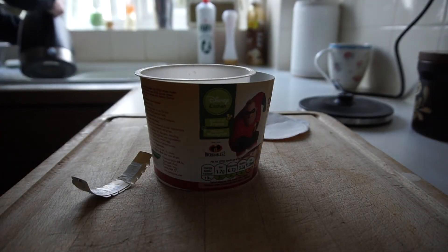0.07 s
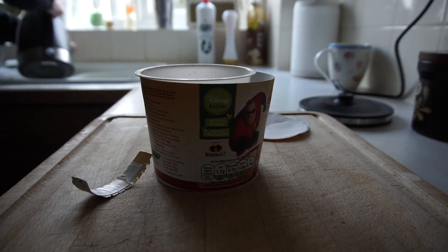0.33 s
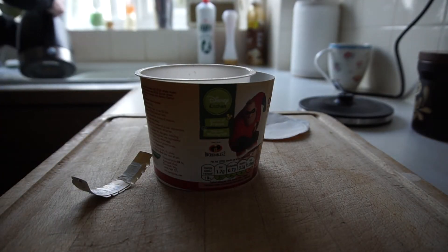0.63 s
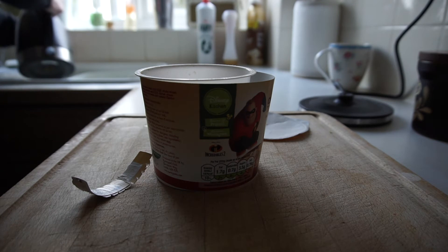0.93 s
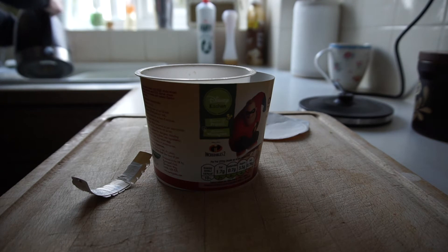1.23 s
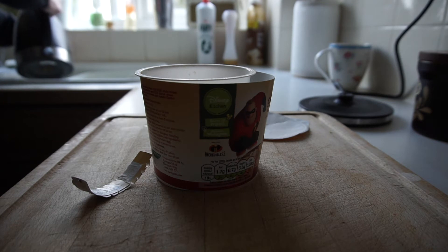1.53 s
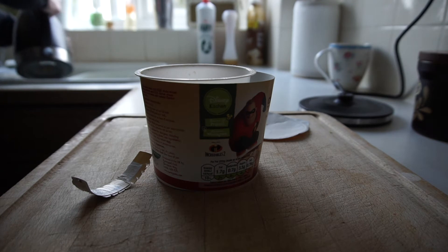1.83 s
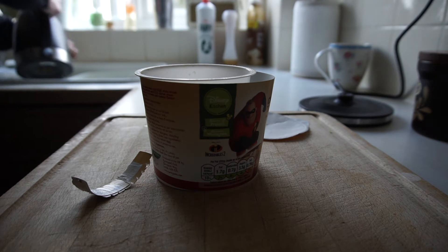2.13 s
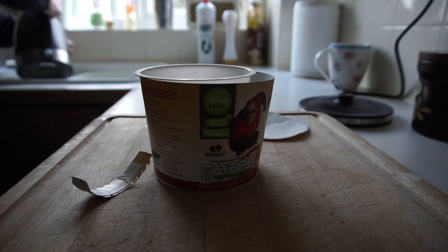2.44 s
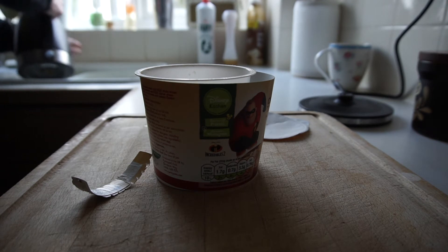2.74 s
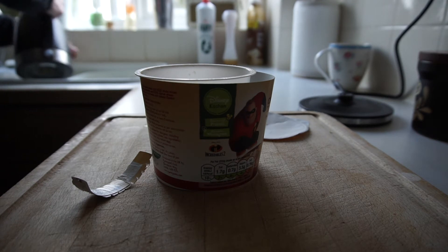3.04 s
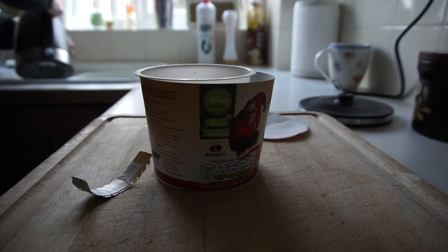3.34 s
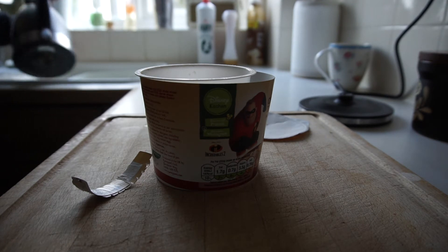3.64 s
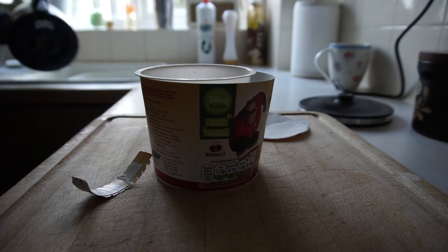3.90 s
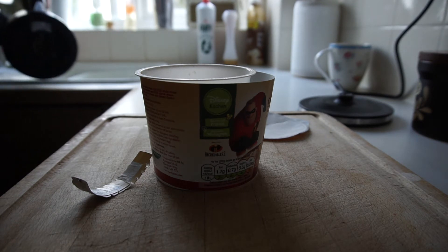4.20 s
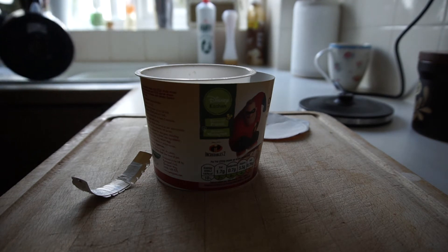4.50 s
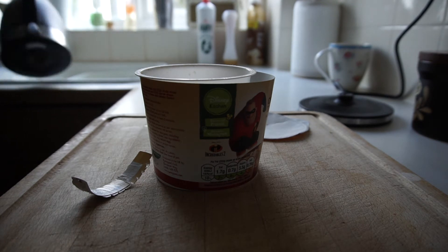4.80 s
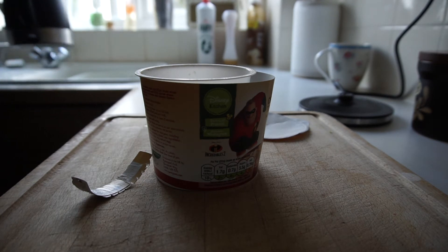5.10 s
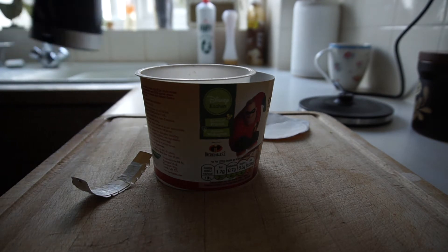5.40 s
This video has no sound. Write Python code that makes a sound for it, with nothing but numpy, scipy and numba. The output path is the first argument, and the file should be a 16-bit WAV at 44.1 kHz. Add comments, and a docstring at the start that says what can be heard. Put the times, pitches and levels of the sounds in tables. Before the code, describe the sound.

In a tiled kitchen, a tap sputters and runs into an electric kettle a couple of metres away, bubbling and spraying with a hollow tone that rises as it fills. The tap closes with a low, ringing thud. A few drips follow, then water gushes from the kettle into a steel sink, ending in one loud slap and a last knock. A faint hiss and hum lie underneath.

```python
"""A tiled kitchen, where a tap runs into an electric kettle a couple of metres away.
The jet entrains ringing bubbles and throws spray; the air in the kettle resonates higher as it fills.
The tap shuts with a ringing thud. The kettle is then tipped over the steel sink:
drips, a splashing gush, one loud slap and a last knock, over a faint hiss and hum."""
import sys
import numpy as np
from scipy import signal
from scipy.fft import rfft, irfft, next_fast_len
from scipy.io import wavfile
from scipy.ndimage import uniform_filter1d
from numba import njit

SR = 44100
rng = np.random.default_rng(int(sys.argv[2]) if len(sys.argv) > 2 else 0)


def wav_record(signal):
    """Record a signal, one row per channel, as 16-bit PCM in the file named by sys.argv[1]."""
    frames = np.transpose(np.atleast_2d(signal))
    bounded = np.clip(frames, -1, 1)
    # unit amplitude maps onto the largest positive 16-bit level
    quanta = np.round(bounded * 32767).astype(np.int16)
    wavfile.write(sys.argv[1], SR, quanta)


N = 249334
TIME = np.arange(N) / SR
GUSH_START_S, GUSH_END_S = 4.358, 5.05
BUBBLE_RISE = 0.046   # fraction by which a bubble's frequency climbs while it rings

# spectrum of small, clearly ringing bubbles: f/Hz, level/dB
PING_SPECTRUM = [(1500, -20), (3000, 0), (4500, -1.5), (7000, -4), (14000, -8)]
# falling drops, each trapping a cluster of bubbles: t/s, level/dB, f/Hz, scatter of f/octaves
DROP_IMPACTS = [(.029, -19.5, 3220, 0.18), (.088, -24.5, 1500, 0.63), (.092, -21, 5000, .03),
                (0.111, -16, 2320, 0.092), (.205, -14.5, 4300, .08), (2.203, -15.5, 1940, 0.2),
                (2.55, -17, 4540, .13), (3.22, -17, 4920, 0.17), (3.815, -38.5, 2700, 0.12),
                (3.988, -40, 11100, 0.21), (4.073, -36, 10700, 0.056), (4.088, -28.5, 3210, 0.22),
                (4.171, -40, 3220, 0.24), (4.246, -25, 2400, 0.023), (4.247, -33, 1860, .015),
                (4.305, -29, 4370, 0.3), (4.362, -25, 2060, 0.18), (4.423, -21, 3900, 0.31),
                (4.442, -10, 3810, 0.16), (4.455, -16, 3800, 0.057), (4.529, -10, 2510, 0.38),
                (4.611, -11, 6040, 0.15), (4.641, -11, 5300, 0.14), (4.681, -7.5, 3300, 0.11),
                (4.688, -13, 2100, 0.22), (4.724, -8, 5030, 0.2), (4.73, -8, 2470, 0.24),
                (4.854, -11.5, 2080, 0.094), (4.857, -17, 5060, 0.43), (4.882, -14, 2600, 0.14),
                (4.913, -14, 2650, 0.23), (4.943, -23, 1085, 0.365), (4.977, -20, 1960, 0.31),
                (4.999, -31, 654, 0.11)]
# blunt blows on tap, kettle and sink: t/s, level/dB, lowest f/Hz, highest f/Hz, ring gain/dB, boom/dB
BLOWS = [(0.227, -16.5, 171, 2050, -36, -31), (0.244, -23.5, 400, 2200, -37, -40),
         (0.68, -34.5, 100, 500, -24, -37), (2.619, -20, 160, 620, -22, -24.5),
         (2.641, -24, 170, 540, -9, -29.5), (2.899, -35, 99, 305, -32, -37),
         (3.562, -24, 288, 1100, -18, -35), (3.579, -25.5, 130, 800, -12.5, -33),
         (3.602, -27.5, 70, 476, -4, -49), (4.165, -47.5, 300, 2500, -23, -63),
         (4.504, -29, 203, 338, -32, -38), (5.524, -26.5, 303, 1700, -26, -56),
         (5.555, -31.5, 295, 1700, -17, -54)]
# stereo width of the room, side relative to mid: f/Hz, level/dB
SIDE_SPECTRUM = [(60, -44), (130, -34), (290, -20.5), (640, -11.5), (1410, -9.5), (3100, -4.5), (6820, -1),
                 (15000, -3)]


def filling():
    """Air entrainment: the plunging jet makes bubbles and spray, which excite the air in the kettle."""
    # spectrum of the churning water: f/Hz, level/dB
    churn_spectrum = [(50, -34), (90, -38), (140, -10), (200, -12.5), (450, -0.5), (800, -8), (1200, -4),
                      (2000, -0.5), (2850, -3), (3200, -10.5), (5000, -10.5), (9000, -18.5)]
    bubbling_db, spray_db = jet()
    churn = bubble_cloud(churn_spectrum, per_s=5500, spread_db=3, cycles=35.5, clump_db=2.5)
    pings = bubble_cloud(PING_SPECTRUM, per_s=1100, spread_db=3, cycles=80, clump_db=2.2)
    mist = spray(per_s=6300, spread_db=5, flicker_db=-0.5)
    spurts = flutter(rate_hz=13.5, depth_db=1)
    water = from_db(bubbling_db) * spurts * churn
    water += from_db(spray_db - 2.5) * pings + from_db(spray_db - 7) * mist
    return kettle_air(water) * while_filling()


def jet(smooth_below_db=-6, cushion_db_per_s=0.5):
    """Bubbling and spray levels (dB) follow the flow; a smooth jet or deeper water throws less spray."""
    # the tap sputters open, runs and is closed in two turns: t/s, flow relative to fully open/dB
    tap_flow = [(0, 0), (.07, -8.5), (.09, -3), (.17, -0.5), (.22, .5), (3.05, -1.75), (3.16, -6),
                (3.25, -5.5), (3.465, -7), (3.5, -11), (3.66, -15.5), (3.9, -36)]
    flow_db, = in_time(tap_flow)
    smoothing_db = 8.7 * np.minimum(flow_db - smooth_below_db, 0)
    return flow_db - 34, flow_db - 32.5 + smoothing_db - cushion_db_per_s * TIME


def while_filling():
    """Gate that closes as the last trickle from the tap ends."""
    return np.interp(TIME, [3.8, 4.05], [1, 0])


def kettle_air(water, block=128):
    """Helmholtz resonance rises as the air volume shrinks; cross modes swell and fade with the depth."""
    # resonance of the air bouncing in the kettle's mouth: t/s, f/Hz, gain/dB
    helmholtz = [(0, 314, 16), (.4, 310, 6), (1.2, 330, 1), (2, 379, 7), (2.8, 460, 6.5), (3.1, 446, -17),
                 (3.5, 426, 2)]
    # cross modes, each driven best at one depth: f/Hz, bandwidth/Hz, gain/dB, strongest at t/s, spread/s
    cross_modes = [(1100, 74, 7, 0.26, 0.55), (1250, 70, 7.5, 2.29, 0.13), (1282, 100, 6.5, 1.7, 0.79),
                   (1336, 45, 13, 2.77, 0.36), (1320, 45, 20.5, 3.354, 0.062), (1562, 50, 9.5, 0.54, 0.19),
                   (1724, 48, 11, 1.25, 0.68), (1860, 38, 3, 1.66, 0.26), (2100, 890, 3.5, 2.86, 0.2),
                   (2370, 410, 1.5, 1.46, 0.65), (2440, 22, 13, 2.7, 0.19), (2810, 43, 6.5, 1.58, 0.41),
                   (3735, 32, 5, 1, 0.67), (3680, 110, 14, 3.21, 0.051), (4900, 32, 4, 0.7, 0.4)]
    cavity_hz, lift_db = in_time(helmholtz)
    note, state = np.zeros(N), np.zeros(2)
    for i in range(0, N, block):
        b, a = resonance(cavity_hz[i], width_hz=36)
        note[i:i + block], state = signal.lfilter(b, a, water[i:i + block], zi=state)
    out = water + from_db(lift_db) * note
    for hz, width_hz, db, best_s, spread_s in cross_modes:
        drive = from_db(db) * np.exp(-.5 * ((TIME - best_s) / spread_s) ** 2)
        out += drive * signal.lfilter(*resonance(hz, width_hz), water)
    return out


def pouring(drum_start_s=4.42, drum_attack_s=0.048):
    """Poured water entrains bubbles and, once the stream is thick, forces the sink floor to vibrate."""
    # spectrum of the splash: f/Hz, level/dB
    splash_spectrum = [(900, -13), (1400, -5.5), (2000, -6), (3000, -0.5), (5000, -3), (9000, -23)]
    # spectrum of the drumming sink floor: f/Hz, level/dB
    drum_spectrum = [(50, -24), (150, -41), (240, 2), (450, 3), (700, 5), (1200, -9), (2200, -19)]
    splash_db, spray_db, drum_db = gush()
    splash = bubble_cloud(splash_spectrum, per_s=2600, spread_db=2, cycles=40, clump_db=4.5)
    pings = bubble_cloud(PING_SPECTRUM, per_s=1800, spread_db=2.5, cycles=63, clump_db=3)
    drum = bubble_cloud(drum_spectrum, per_s=3000, spread_db=2.5, cycles=9.1, clump_db=5)
    drum *= np.clip((TIME - drum_start_s) / drum_attack_s, 0, 1)
    water = from_db(splash_db) * splash + from_db(spray_db - 5) * pings + from_db(drum_db) * drum
    return water * while_pouring()


def gush(attack_s=0.11, swell_s=0.25, rise_db=8, swell_db_per_s=1.5, fall_db_per_s=48):
    """Splash, spray and drumming levels (dB) follow the outflow, which surges, crests and thins out."""
    starting = np.minimum((TIME - GUSH_START_S) / attack_s - 1, 0)
    since_crest = TIME - GUSH_START_S - attack_s - swell_s
    swelling_s, thinning_s = np.minimum(since_crest, 0), np.maximum(since_crest, 0)
    choke_db = 11 * np.exp(-.5 * ((TIME - 4.84) / 0.012) ** 2)   # a gulp of air enters the kettle
    flow_db = rise_db * starting + swell_db_per_s * swelling_s - fall_db_per_s * thinning_s - choke_db
    spray_db = flow_db - 26.5 - 11 * thinning_s   # a thinning stream loses its spray first
    return flow_db - 31, spray_db, 0.99 * flow_db - 44


def while_pouring(edge_s=0.018):
    """Gate that is open while water falls from the kettle."""
    corners_s = [GUSH_START_S - edge_s, GUSH_START_S, GUSH_END_S, GUSH_END_S + edge_s]
    return np.interp(TIME, corners_s, [0, 1, 1, 0])


def slap():
    """Impact: water lands flat and breaks up in a duller wash; the thin steel radiates no bass."""
    # the impact and its wash: t/s, level/dB, T60/s, low-pass f/Hz
    stages = [(5.052, -8.5, 0.1, 17950), (5.098, -25, 0.27, 3500)]
    # spectrum of water striking steel: f/Hz, level/dB
    slap_spectrum = [(80, -41), (252, 2.5), (350, -19), (436, 0.5), (693, -10), (965, -5), (1080, -1),
                     (1290, 1), (1870, -2), (2330, 4), (2600, -3), (6280, -13.5), (12700, -18.5),
                     (15500, -35)]
    burst = rms_one(colour(clicks(per_s=16000, spread_db=2), slap_spectrum))
    impact = np.zeros(N)
    for s, db, t60, top_hz in stages:
        impact += butterworth(from_db(db) * dying(s, t60) * burst, 1, top_hz, "low")
    return butterworth(impact, 5, 190, "high")


def drops(count=6, gap_s=0.0045, fade_db=2.5, cycles=41.3):
    """Each drop entrains a run of bubbles: the first on its pitch, the rest scattered and ever weaker."""
    out = np.zeros(N)
    for s, db, hz, scatter_octaves in DROP_IMPACTS:
        delays = gap_s * np.arange(count) * rng.uniform(.8, 1.2, count)
        octaves = scatter_octaves * np.clip(rng.standard_normal(count), -2, 2) * (delays > 0)
        pitches = hz * 2 ** octaves
        out += sum(bubble(s + delays[k], db - fade_db * k, pitches[k], cycles) for k in range(count))
    return out


def splats(t60=0.045):
    """Impact noise: the more a drop scatters, the louder it splats on the steel."""
    force = sum(from_db(db + 1) * scatter * dying(s, t60) for s, db, _, scatter in DROP_IMPACTS)
    crackle = butterworth(clicks(per_s=6000, spread_db=2), 2, [1700, 8500], "band")
    return force * rms_one(crackle)


def glugs(cycles=73):
    """Each gulp of air in the kettle resonates as one very large bubble."""
    # gulps of air: t/s, level/dB, f/Hz
    gulps = [(0.52, -28, 324), (0.814, -35, 317), (2.985, -30.5, 442), (3.046, -31.5, 446),
             (3.149, -30, 450), (3.273, -34.5, 445), (4.636, -38.5, 338)]
    return sum(bubble(s, db, hz, cycles) for s, db, hz in gulps)


def dregs(start_s=4.908, gap_s=0.004, count=32, fall_octaves_per_s=20.3, fade_db_per_s=109):
    """Larger bubbles resonate lower: ever deeper ones join the small ones as the last water runs out."""
    delays = gap_s * (np.arange(count) + rng.random(count))
    top_octaves = 0.36
    span_octaves = top_octaves + fall_octaves_per_s * delays
    pitches = 2100 * 2 ** (top_octaves - rng.random(count) * span_octaves)
    return sum(bubble(start_s + delay, -8.5 - fade_db_per_s * delay, hz, cycles=7)
               for delay, hz in zip(delays, pitches))


def knocks(t60=0.046):
    """Damped impact: a blunt blow gives a short, dull clatter of band-limited noise."""
    out = np.zeros(N)
    for s, db, low_hz, high_hz, *_ in BLOWS:
        out += from_db(db) * noise_band(dying(s, t60), 2, low_hz, high_hz)
    return out


def cabinet(t60=0.045):
    """Structure-borne sound: each blow booms briefly in the cabinet under the sink."""
    force = sum(from_db(boom_db) * dying(s, t60) for s, *_, boom_db in BLOWS)
    return noise_band(force, 3, low_hz=135, high_hz=290)


def knock_ring(contact_s=0.0037):
    """Damped free vibration: the low, hollow ring of tap, pipe and kettle after each knock."""
    # resonances of tap, pipe and kettle: f/Hz, level/dB, T60/s
    modes = [(135.6, -13.5, 0.2), (386, -0.5, 0.41), (450, 5.5, 0.14), (581, -14, 0.1), (1000, -12, 0.2)]
    age, force = TIME[:SR], np.zeros(N)
    for s, db, _, _, ring_db, _ in BLOWS:
        force[round(s * SR)] += from_db(db + ring_db)
    ring = sum((-1) ** k * from_db(db - 60 * age / t60) * np.sin(2 * np.pi * hz * age)
               for k, (hz, db, t60) in enumerate(modes))
    return signal.fftconvolve(force, np.minimum(age / contact_s, 1) * ring)[:N]


def spatters(attack_s=0.0085, t60=0.069):
    """A flung sheet of water breaks into a shower; the finer the droplets, the brighter their impacts."""
    # showers of droplets: t/s, level/dB, lowest f/Hz
    showers = [(0.852, -18.5, 7500), (0.893, -23, 6000), (1.008, -23, 10000), (1.783, -20, 4000),
               (2.25, -19, 9900), (4.104, -36.5, 5000), (4.358, -20.5, 3500), (4.44, -21.5, 7000),
               (4.64, -22, 4000), (4.725, -29, 3500), (4.785, -16, 4000), (4.892, -21, 4000)]
    out, droplets = np.zeros(N), spray(per_s=6600, spread_db=0.5, flicker_db=0)
    for s, db, low_hz in showers:
        envelope = np.clip((TIME - s) / attack_s, 0, 1) * dying(s, t60)
        out += from_db(db) * envelope * rms_one(butterworth(droplets, 2, low_hz, "high"))
    return out


def stray_spray():
    """Droplets that fly clear tick crisply in the sink, unfiltered by the kettle's resonances."""
    from_tap = from_db(jet()[1] - 3.5) * while_filling()
    from_kettle = from_db(gush()[1] - 5.5) * while_pouring()
    return (from_tap + from_kettle) * spray(per_s=2000, spread_db=1.5, flicker_db=3)


def spray(per_s, spread_db, flicker_db):
    """Shot noise at unit rms: tiny droplets tick too briefly to have a pitch."""
    # spectrum of droplet impacts: f/Hz, level/dB
    tick_spectrum = [(1500, -19), (3500, 1.5), (5500, 4), (8000, 2), (11500, -0.5), (15500, -6.5)]
    ticks = clicks(per_s, spread_db) * flutter(rate_hz=33, depth_db=flicker_db)
    return rms_one(colour(ticks, tick_spectrum))


def bubble(s, db, hz, cycles):
    """Minnaert resonance: trapped air pulsates, dies away and rises in pitch as it nears the surface."""
    age = TIME[:SR // 5]
    life = hz * age / cycles   # reaches 1 at 60 dB of decay
    phase = 2 * np.pi * hz * age * (1 + BUBBLE_RISE * (np.minimum(life, 1) - .5) / 2)
    swell = 1 - np.exp(-(hz * age) ** 2)
    note = from_db(db - 60 * life) * swell * np.sin(phase)
    out, start = np.zeros(N), round(s * SR)
    out[start:start + len(note)] = note
    return out


def bubble_cloud(spectrum, per_s, spread_db, cycles, clump_db, bands=20):
    """Incoherent sum, at unit rms, of bubbles of all sizes, each ringing at its own natural frequency."""
    births = clicks(per_s, spread_db)
    starts = np.flatnonzero(births)
    low, high = np.sqrt(np.clip([spectrum[0][0], spectrum[-1][0]], 110, 15000))
    hz = (low + (high - low) * rng.random(N)[starts]) ** 2
    amplitudes = births[starts] * hz ** .75
    third_octave = (3 * np.log2(hz)).astype(int) % bands
    for k in range(bands):   # bubbles of like size are shed in clumps, which makes the water gurgle
        amplitudes *= np.where(third_octave == k, flutter(rate_hz=15.6, depth_db=clump_db)[starts], 1)
    lives, turn = cycles * SR / hz, 2 * np.pi * hz / SR   # samples, radians per sample
    steps = np.exp(1j * turn - np.log(1000) / lives)
    bends = np.exp(1j * turn * BUBBLE_RISE / lives)
    cloud = ring_bubbles(N, starts, amplitudes, lives.astype(np.int64), steps, bends)
    return rms_one(colour(cloud, spectrum))


@njit
def ring_bubbles(length, starts, amplitudes, lives, steps, bends):
    """Damped oscillators as phasors: each turns and shrinks by its step, which bends up in frequency."""
    out = np.zeros(length)
    for k in range(len(starts)):
        phasor, step = amplitudes[k] + 0j, steps[k]
        for i in range(starts[k], min(starts[k] + lives[k], length)):
            out[i] += phasor.real
            phasor *= step
            step *= bends[k]
    return out


def kitchen(source, direct_db, octaves=10):
    """Reverberation: central direct sound, then diffuse reflections off the tiles, decaying by octave."""
    # reverberation time of the kitchen: f/Hz, T60/s
    decay_times = [(120, 0.4), (400, 0.4), (1500, 0.41), (4000, 0.35), (12000, 0.38)]
    age, hz = TIME[:SR], np.fft.rfftfreq(SR, 1 / SR)
    centres = 32 * 2. ** np.arange(octaves)
    white, tails = rfft(rng.standard_normal((2, SR))), np.zeros((2, SR))
    for k, centre in enumerate(centres):
        band = irfft(white * np.interp(hz, centres, np.eye(octaves)[k]), SR)
        fade = from_db(-60 * age / at_hz(decay_times, centre))
        tails += band * fade / np.linalg.norm(fade)
    mid = whitened(tails[0] + from_db(direct_db) * (age == 0))
    side = colour(whitened(tails[1]), SIDE_SPECTRUM)
    return np.array([signal.fftconvolve(source, echo)[:N] for echo in (mid + side, mid - side)])


def background(hiss_db=-54.5):
    """Noise floor: soft broadband hiss and the tonal hum of an appliance."""
    # spectrum of the hiss: f/Hz, level/dB
    hiss_spectrum = [(40, -79), (359, -7.5), (397, -12), (637, -14), (722, -15), (881, -15.5), (2990, -10),
                     (6010, -15.5), (7910, -15), (15500, -19)]
    # hum lines: f/Hz, rms level/dB
    hum_lines = [(398.4, -69.5), (742.9, -70.5)]
    mid, side = (rms_one(colour(noise, hiss_spectrum)) for noise in rng.standard_normal((2, N)))
    hiss = mid + colour(side, SIDE_SPECTRUM) * [[1], [-1]]
    hum = sum(from_db(db) * np.sqrt(2) * np.sin(2 * np.pi * hz * TIME) * flutter(3.2, 0.38)
              for hz, db in hum_lines)
    return from_db(hiss_db) * hiss + hum


def from_db(db):
    """Amplitude ratio of a level."""
    return 10 ** (np.asarray(db) / 20)


def rms_one(x):
    """Normalise to unit rms."""
    return x / np.sqrt(np.mean(x ** 2) + 1e-20)


def in_time(rows):
    """Interpolate a table's columns at every sample."""
    s, *columns = np.transpose(rows)
    return [np.interp(TIME, s, column) for column in columns]


def at_hz(points, hz):
    """Interpolate a table on a log-frequency axis."""
    f, value = np.transpose(points)
    return np.interp(np.log(hz + 1e-9), np.log(f), value)


def colour(x, spectrum):
    """Zero-phase filtering by a table of f/Hz, level/dB."""
    size = next_fast_len(2 * x.shape[-1])
    gain = from_db(at_hz(spectrum, np.fft.rfftfreq(size, 1 / SR)))
    return irfft(rfft(x, size) * gain, size)[..., :x.shape[-1]]


def whitened(echo, width_hz=45):
    """Flatten the smoothed power spectrum of a one-second echo and end it at 0.75 s."""
    spectrum = rfft(echo)
    power = uniform_filter1d(np.abs(spectrum) ** 2, width_hz)
    return irfft(spectrum / np.sqrt(power + 1e-12), SR)[:SR * 3 // 4]


def butterworth(x, order, hz, kind):
    """Filter with a maximally flat passband."""
    return signal.sosfilt(signal.butter(order, hz, kind, fs=SR, output="sos"), x + 1e-18)


def noise_band(envelope, order, low_hz, high_hz):
    """Band-limited noise burst whose power is independent of its bandwidth."""
    band = butterworth(envelope * rng.standard_normal(N), order, [low_hz, high_hz], "band")
    return np.sqrt(SR / 2 / (high_hz - low_hz)) * band


def resonance(hz, width_hz):
    """Coefficients of a two-pole resonator with unit peak gain."""
    r = np.exp(-np.pi * width_hz / SR)
    return (1 - r * r) / 2 * np.array([1, 0, -1]), [1, -2 * r * np.cos(2 * np.pi * hz / SR), r * r]


def dying(s, t60):
    """Exponential decay from 1 at time s."""
    return (TIME >= s) * from_db(-60 * np.clip((TIME - s) / t60, 0, 10))


def clicks(per_s, spread_db):
    """Poisson impulses, many small and a few large."""
    occurs = rng.random(N) < per_s / SR
    sizes = from_db(spread_db * np.minimum(rng.exponential(1, N), 5))
    return occurs * sizes * rng.choice([-1, 1], N)


def flutter(rate_hz, depth_db, hop=40, settle=2000):
    """Random amplitude modulation: a gain whose level follows low-passed noise."""
    r = np.exp(-2 * np.pi * rate_hz * hop / SR)
    noise = rng.standard_normal(N // hop + settle + 2)
    slow = rms_one(signal.lfilter([1], [1, -2 * r, r * r], noise)[settle:])
    return from_db(depth_db * np.interp(np.arange(N) / hop, np.arange(len(slow)), slow))


def scene():
    """Superposition: each group of sources reaches the microphones by its own reflections."""
    water = kitchen(filling() + pouring() + slap(), direct_db=-5.5)
    impacts = kitchen(drops() + splats() + glugs() + dregs() + knocks() + cabinet(), direct_db=-0.5)
    ringing = kitchen(knock_ring(), direct_db=6)
    droplets = kitchen(stray_spray() + spatters(), direct_db=0.5)
    return water + impacts + ringing + droplets + background()


def record(dry):
    """Band limiting: the microphones lose the deep bass, and the top is cut steeply."""
    low_hz, top_hz = 76.4, 16000
    thin = butterworth(dry, 2, low_hz, "high")
    return signal.sosfilt(signal.ellip(12, .1, 80, top_hz, fs=SR, output="sos"), thin)


dry = scene()
out = record(dry)
wav_record(out)
```